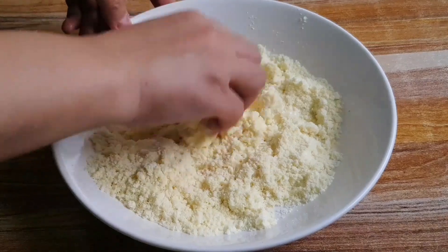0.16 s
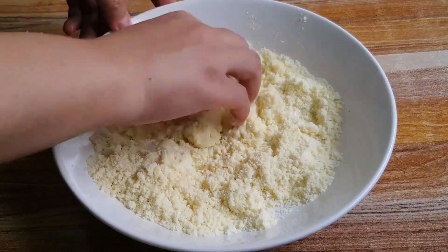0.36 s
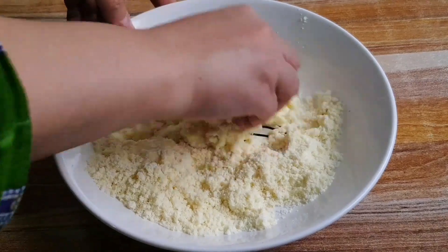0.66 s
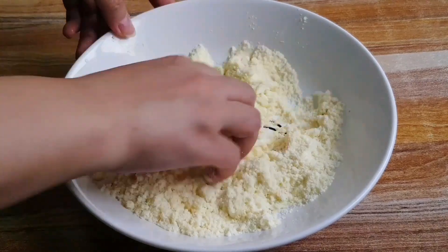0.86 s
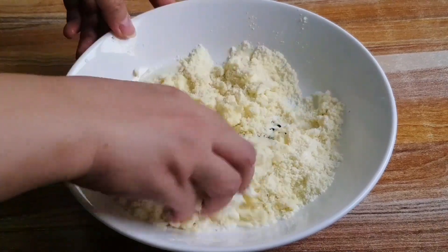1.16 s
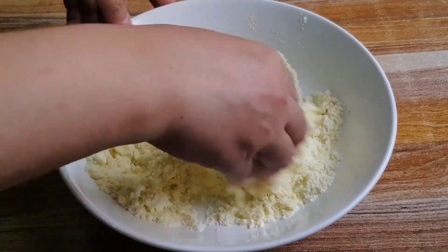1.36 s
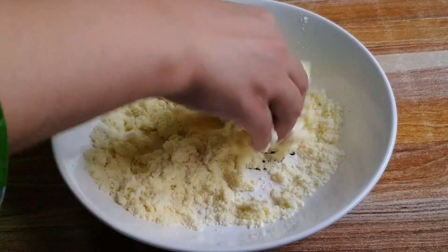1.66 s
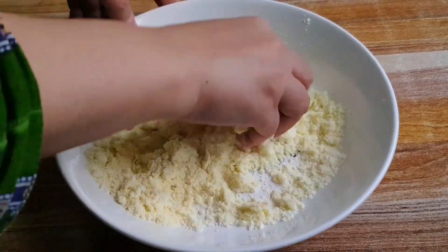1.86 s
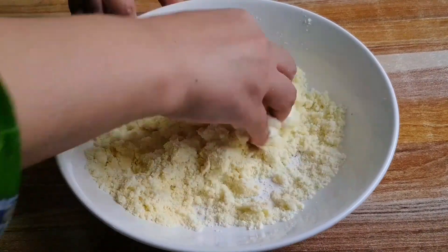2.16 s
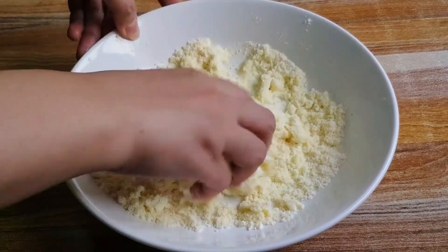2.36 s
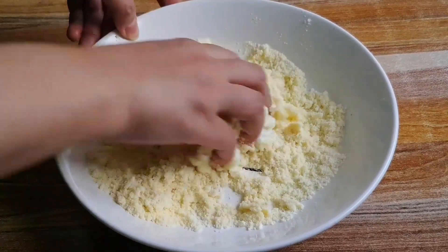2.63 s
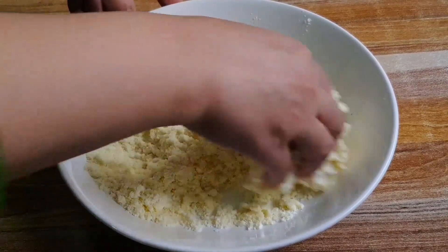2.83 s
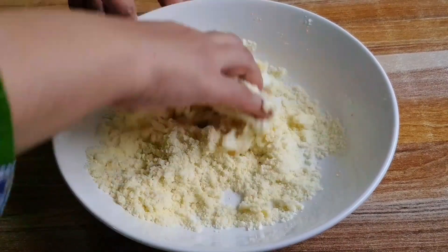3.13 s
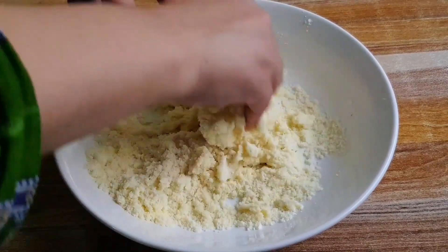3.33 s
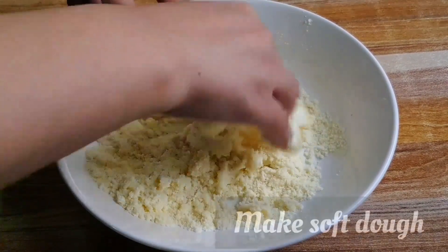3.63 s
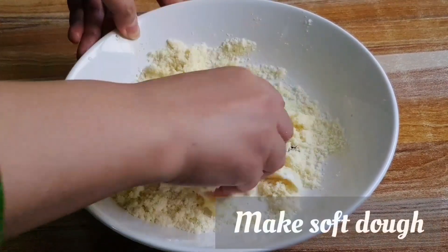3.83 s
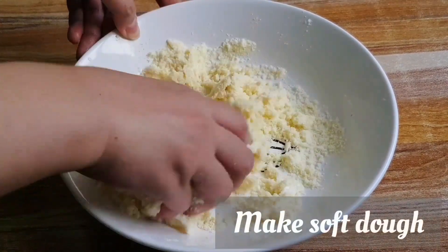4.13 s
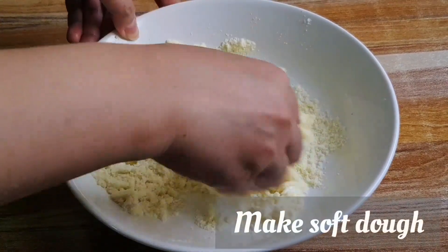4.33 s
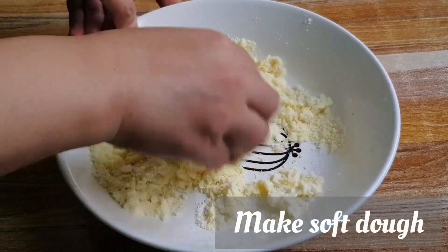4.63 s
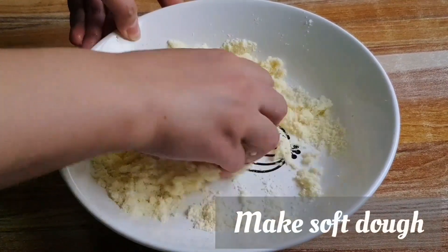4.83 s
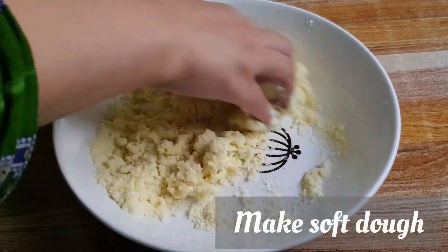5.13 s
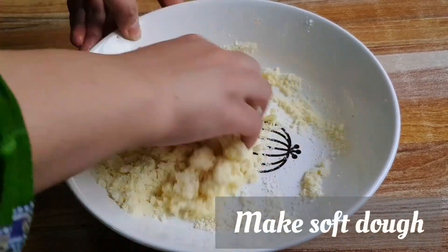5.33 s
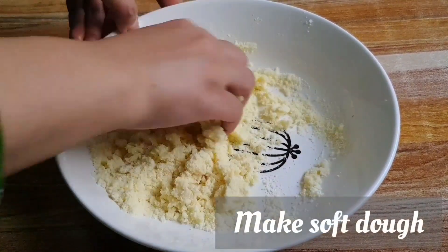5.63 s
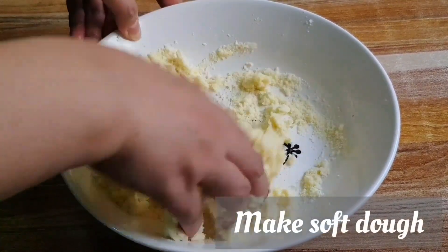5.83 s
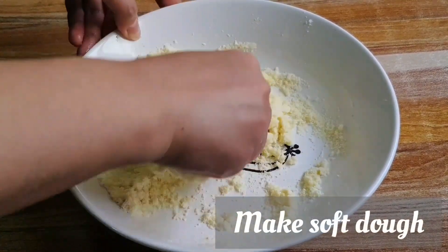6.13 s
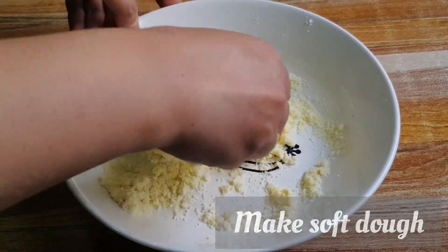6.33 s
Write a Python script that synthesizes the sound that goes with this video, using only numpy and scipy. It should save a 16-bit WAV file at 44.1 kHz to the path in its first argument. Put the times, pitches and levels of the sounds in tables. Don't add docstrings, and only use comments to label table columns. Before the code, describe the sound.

In a small kitchen, close to the microphone, fingers rub dry crumbly dough in a ceramic bowl. From 0 seconds, short gritty swishes come about three or four a second, hissing softly along the glaze, with a light crumb spray at 0.1. A distant motor hums low, surging and throbbing unevenly, with a thin wavering whine, deep room rumble and faint hiss. A slight nudge comes at 0.7, then firmer woody bumps at 1.5 and 1.7 as the bowl rocks, with scattered crumbs. Strokes continue alone with tiny squeaks from 2 to 2.7. A sharp knock lands at 3.0, duller ones at 3.7 to 4.3. The heaviest cluster runs from 4.4 to 5.2: a hard clack at 4.5 with loud crumbs, a strong stroke at 4.8, a ringing knock at 5.15. Afterwards come soft rubbing, brief squeaks at 5.3 and 6.0 and small sprays, fading into humming rumble by 6.5.

```python
import sys
import numpy as np
from scipy import signal
from scipy.fft import rfft, irfft
from scipy.io import wavfile
from scipy.ndimage import uniform_filter1d

SR = 44100
rng = np.random.default_rng(int(sys.argv[2]) if len(sys.argv) > 2 else 0)


def volts_from_db(level):
    exponent = np.asarray(level, float) / 20
    return 10 ** exponent


def generate_wav(sig):
    pcm = np.round(np.clip(np.atleast_2d(sig).T, -1, 1) * 32767).astype(np.int16)
    wavfile.write(sys.argv[1], SR, pcm)


N = 285768

# hz [Hz], density_db [dB per Hz]
DRAG_SPECTRUM = [(900, -42), (1500, 0.5), (2200, 1), (3500, -4.5), (5500, -8.5), (6500, -30), (9000, -43)]
CRUMB_SPECTRUM = [(3000, -30), (4500, -8.5), (5000, 1.5), (7000, -1.5), (8800, -3), (10000, -16.5),
                  (13000, -38)]
DUST_SPECTRUM = [(6000, -51), (9000, -5), (10500, 1.5), (13000, 2), (14500, -2), (16500, -0.5)]


def rub():
    out = np.zeros((2, N))
    for gain, spectrum in zip(pressure(), (DRAG_SPECTRUM, CRUMB_SPECTRUM, DUST_SPECTRUM)):
        large = rng.random(N) < 0.04
        size = 0.5 + volts_from_db(2.9 * np.minimum(rng.exponential(1, N), 3)) * large
        grains = [colour(size * noise, spectrum) for noise in rng.standard_normal((2, N))]
        out += volts_from_db(2.5) * gain * np.array(grains)
    catch = evened(uniform_filter1d(rng.standard_normal(N), size=900))
    crosstalk = 0.054 * out[::-1]
    return (out + crosstalk) * volts_from_db(1.1 * catch)


# peak_s [s], pressure_db [dB], fineness_db [dB], length_s [s]
FINGER_STROKES = [(0.128, -67.5, 1, 0.083), (.34, -79, 0, 0.14), (.58, -76.5, -1, 0.11),
                  (0.827, -77.5, -2, 0.22), (1.16, -72.5, 1.5, 0.19), (1.477, -70.5, 2, 0.11),
                  (1.575, -78, -10, 0.085), (1.735, -70, -4, 0.16), (2.055, -72.5, 0, 0.14),
                  (2.338, -70.5, 0.5, 0.16), (2.654, -75, -1, .2), (2.922, -70.5, 4.5, .1),
                  (2.99, -71.5, 3, 0.15), (3.204, -73.5, 2, 0.21), (3.495, -74, 1, 0.13),
                  (3.723, -75, 8, 0.12), (3.818, -77, -6, 0.23), (4.15, -70.5, 1, 0.22),
                  (4.474, -70.5, 5, 0.13), (4.535, -70.5, -13, 0.1), (4.787, -66, -0.5, 0.11),
                  (5.03, -73.5, 4, 0.29), (5.133, -70.5, -5, 0.15), (5.29, -73.5, 0, 0.23),
                  (5.623, -77.5, -1, 0.26), (5.87, -74, 9, 0.14), (5.963, -69.5, -1.5, 0.19),
                  (6.224, -71, 1.5, 0.15), (4.0, -81, 9, .15)]
# level_db [dB] of drag, crumbs and dust
REST_LEVELS = [-78.5, -85.5, -78.5]


def pressure():
    rise_db, fall_db = 23, 17.5
    t = np.arange(0, N + 64, 64) / SR
    power = volts_from_db(REST_LEVELS)[:, None] ** 2 * np.ones(len(t))
    for s, db, fine_db, length in FINGER_STROKES:
        u = (t - s) / length
        drag_db = 0.5 - 0.9 * fine_db
        dust_db = 0.5 + 0.7 * max(fine_db, 0)
        stroke_db = db + np.minimum(rise_db * u, -fall_db * u)
        power = power + volts_from_db(stroke_db + np.array([[drag_db], [0], [dust_db]])) ** 2
    return [np.interp(np.arange(N) / SR, t, np.sqrt(p)) for p in power]


# start_s [s], peak_db [dB], table_thump_db [dB], bowl_ring_db [dB], room_share_db [dB]
HARD_KNOCKS = [
    (1.543, -31, -34.5, -38.5, 4),
    (2.98, -27.5, -43.5, -46, -5.5),
    (3.84, -36.5, -40.5, -43, 6.5),
    (4.251, -35.5, -45, -57, -8),
    (4.525, -23, -42, -44.5, -8.5),
    (5.061, -40.5, -52, -50, 2),
    (5.146, -24.5, -41, -35.5, 0),
]
# mode_hz [Hz], level_db [dB], t60_s [s]
FOOT_MODES = [(285, -3, .14), (520, -7, .2), (628, -3, .28), (785, -12, .22), (916, -13, .2),
              (1090, -20, .15)]


def hard_knocks():
    return knocks(HARD_KNOCKS, 502, FOOT_MODES, snap_hz=1650, snap_near_db=-8, snap_db=-9.5)


# start_s [s], peak_db [dB], table_thump_db [dB], bowl_ring_db [dB], room_share_db [dB]
SOFT_NUDGES = [(0.703, -47, -63, -56, -7), (1.184, -50, -54, -59, -2), (1.463, -31.5, -39, -49.5, -3),
               (1.703, -29.5, -62, -38, -2), (3.179, -51, -58, -57, -11), (3.737, -39.5, -48, -57, 3.5),
               (4.102, -44, -44, -57.5, 5.5), (4.156, -51, -47, -60, 1), (4.403, -29.5, -56, -40, -0.5),
               (4.854, -42, -59, -59, -18), (4.972, -47, -47, -54, -2), (5.876, -56, -47, -55, -6),
               (6.384, -60, -59, -68, -1)]
# mode_hz [Hz], level_db [dB], t60_s [s]
BODY_MODES = [(259.7, 9, 0.092), (352, 5.5, 0.17), (461, -4, 0.21), (661.3, -1.5, 0.13)]


def soft_nudges():
    return knocks(SOFT_NUDGES, 373, BODY_MODES, snap_hz=1160, snap_near_db=6.5, snap_db=-7.5)


# mode_hz [Hz], level_db [dB], t60_s [s]
TABLE_MODES = [(84.3, -1, 0.2), (108, -5.5, 0.14), (248.5, -8, 0.17)]


def knocks(rows, hz, bowl, snap_hz, snap_near_db, snap_db):
    direct, wet = np.zeros(N), np.zeros(N)
    u = (np.arange(400) / SR - 0.0022) * snap_hz
    snap = np.sin(2 * np.pi * u) * np.exp(-(u / 0.99) ** 2)
    pulse = contact(hz)
    for s, peak_db, table_db, bowl_db, room_db in rows:
        i = round(s * SR)
        ring = volts_from_db(table_db + 11.5) * ringing(TABLE_MODES, rise_s=0.011, spread=0.065)
        ring += volts_from_db(bowl_db) * ringing(bowl, rise_s=0.0055, spread=0.86)
        direct[i:i + len(ring)] += ring[:N - i]
        snap_gain = volts_from_db(bowl_db + snap_db)
        direct[i:i + 400] += volts_from_db(peak_db + 3.0) * pulse + snap_gain * volts_from_db(snap_near_db) * snap
        wet[i:i + 400] += volts_from_db(room_db) * (volts_from_db(peak_db + 3.5) * pulse + snap_gain * snap)
    return direct * volts_from_db([[1.2], [-1.2]]), wet


def contact(hz):
    u = (np.arange(400) / SR - 0.0018) * hz
    rebound = np.where(u > 0, np.exp(-1.5 * u), 1)
    return np.cos(2 * np.pi * u) * np.exp(-(u / 0.35) ** 2) * rebound


def ringing(modes, rise_s, spread):
    t, ring = np.arange(SR // 2) / SR, 0
    phases = spread * rng.uniform(0, 2 * np.pi, len(modes))
    for (hz, db, t60), phase in zip(modes, phases):
        ring = ring + volts_from_db(db - 60 * t / t60) * np.sin(2 * np.pi * hz * t + phase)
    return ring * (1 - np.exp(-(t / rise_s) ** 2))


# band_hz [Hz], t60_s [s]
ROOM_DECAY = [(100, 0.76), (330, 0.33), (870, 0.19), (1400, 0.33), (2300, 0.11), (8000, 0.11)]
# band_hz [Hz], likeness [0 to 1]
PORT_LIKENESS = [(60, 0.89), (250, 1), (500, 0.59), (1000, 0.19), (2000, 0.055), (4000, 0.11)]


def kitchen(x, gap_s):
    taps = np.zeros((2, SR // 2))
    at = np.arange(0, SR // 2 - 20, 20)
    at = at + rng.integers(0, 20, at.shape)
    taps[:, at] = rng.choice([-1., 1.], (2, len(at)))
    hz, t, z = signal.stft(taps, SR, nperseg=512)
    same = np.clip(read(PORT_LIKENESS, hz), 0, 1)[:, None]
    z[1] = same * z[0] + np.sqrt(1 - same ** 2) * z[1]
    decay = volts_from_db(-60 * t / read(ROOM_DECAY, hz)[:, None])
    tail = signal.istft(z * decay, SR, nperseg=512)[1]
    t = np.arange(tail.shape[1]) / SR
    tail *= np.clip(t / gap_s - 0.5, 0, 1)
    tail *= 1 + 0.25 * np.cos(2 * np.pi * (t - 0.011) / 0.0303)
    return signal.fftconvolve(x[None], tail / np.linalg.norm(tail[0]), axes=1)[:, :N]


# start_s [s], level_db [dB], centre_hz [Hz], width_hz [Hz], t60_s [s]
CRUMB_SPRAYS = [
    (.105, -62, 8000, 7000, .2),
    (1.702, -57.5, 6000, 7000, 0.26),
    (4.455, -66, 6000, 2500, 0.32),
    (4.516, -56, 4333, 2982, 0.38),
    (5.865, -61.5, 10800, 4980, 0.23),
    (6.195, -63, 9000, 7000, 0.19),
]


def scatters():
    t, out = np.arange(SR // 2) / SR, np.zeros((2, N))
    for s, db, hz, width, t60 in CRUMB_SPRAYS:
        band = signal.butter(2, [hz - width / 2, hz + width / 2], "bandpass", fs=SR, output="sos")
        large = rng.random(len(t)) < 0.02
        grains = rng.standard_normal((2, len(t))) * (1 + 1.5 * large)
        envelope = volts_from_db(db - 60 * t / t60) * np.minimum(t / 0.0041, 1)
        spray = evened(signal.sosfilt(band, grains)) * envelope
        i = round(s * SR)
        out[:, i:i + len(t)] += spray[:, :N - i]
    return out


# centre_s [s], pitch_hz [Hz], level_db [dB], length_s [s]
FINGER_SQUEAKS = [(0.86, 2170, -81, 0.045), (2.056, 2140, -79, .05), (2.074, 2074, -80, .05),
                  (2.39, 2145, -76.5, 0.049), (2.666, 2100, -76, 0.044), (3.206, 2130, -76, 0.046),
                  (5.285, 2150, -73, 0.071), (5.98, 2170, -75, 0.066)]


def squeaks():
    t, out = np.arange(N) / SR, np.zeros(N)
    flutter = 1 + 0.47 * evened(uniform_filter1d(rng.standard_normal(N), size=400))
    for s, hz, db, length in FINGER_SQUEAKS:
        bell = np.exp(-(2 * (t - s) / length) ** 2)
        out += volts_from_db(db + 8.5) * bell * np.sin(2 * np.pi * hz * t)
    return out * flutter


# start_s [s], length_s [s], level_db [dB]
HUM_SURGES = [(.34, 0.12, -48), (0.527, 0.69, -48.5), (1.662, 0.091, -47), (3.33, .33, -45),
              (3.653, 0.53, -45), (4.374, 0.11, -47.5), (4.514, .08, -47), (4.664, 0.077, -48),
              (5.1, .2, -59), (5.58, .09, -49), (5.78, 0.53, -46.5)]
# start_s [s], length_s [s],
# # level_db [dB], pitch_hz [Hz]
OCTAVE_THROBS = [(0.066, 0.25, -51.5, 119.2), (0.415, 0.084, -48, 115), (.66, .3, -51.5, 115.3),
                 (1.1, 0.32, -52.5, 115.2), (1.45, 0.22, -46.5, 112), (1.714, 0.063, -40.5, 112),
                 (1.831, 0.14, -47.5, 116.4), (2.407, 0.046, -49.5, 117), (2.607, 0.079, -56, 117),
                 (2.886, 0.22, -47.5, 112.5), (3.45, 0.2, -50.5, 113.1), (3.8, 0.12, -45.5, 112),
                 (4.09, 0.095, -50, 108.5), (4.52, .07, -46, 109), (4.665, 0.053, -42.5, 117.5),
                 (4.995, .25, -54.5, 117.5), (5.674, 0.12, -47.5, 113.4), (6.103, 0.044, -48, 108),
                 (6.4, 0.25, -48.5, 112.7)]
# time_s [s], level_db [dB]
DRONE_LEVEL = [(0.0, -52), (0.5, -49.5), (1.48, -53), (2.2, -52.5), (2.47, -46.5), (2.88, -65),
               (3.01, -45.5), (3.5, -52), (4.56, -51), (4.98, -60.5), (5.32, -51.5), (5.81, -59),
               (6.0, -50.5), (6.48, -49.5)]


def motor():
    hum_hz = 58
    surge = sum(volts_from_db(db) * plateau(s, length, 0.075, hum_hz) for s, length, db in HUM_SURGES)
    throb = sum(volts_from_db(db) * plateau(s, length, 0.1, hz) for s, length, db, hz in OCTAVE_THROBS)
    idle = volts_from_db(-58.5) * fuzz(hum_hz + 2.3, 14) + volts_from_db(-56) * fuzz(115.5, 11)
    drone = volts_from_db(curve(DRONE_LEVEL) - 0.5) * fuzz(223.9, 21.9)
    return surge + throb + idle + drone * volts_from_db([[0.5], [-0.5]])


def plateau(start, length, edge_s, hz):
    out = np.zeros(N)
    at = slice(max(round((start - edge_s) * SR), 0), round((start + length + edge_s) * SR))
    t = np.arange(N)[at] / SR
    swell = np.clip(0.5 + np.minimum(t - start, start + length - t) / edge_s, 0, 1)
    out[at] = np.sqrt(2) * np.sin(np.pi / 2 * swell) ** 2 * np.sin(2 * np.pi * hz * t)
    return out


def fuzz(hz, width):
    off = (np.fft.rfftfreq(N, 1 / SR) - hz) / (width / 2)
    return evened(irfft(rfft(rng.standard_normal(N)) / (1 + off ** 2), N))


# time_s [s], level_db [dB]
WHINE_LEVEL = [(0, -71.5), (.9, -72), (1.5, -71.5), (2.6, -72), (3.4, -75.5), (4.3, -72), (5.3, -75.5),
               (6.48, -77.5)]


def whine():
    noise = rng.standard_normal(N)
    waver = evened(uniform_filter1d(uniform_filter1d(noise, size=1200), size=1200))
    hz = 1851 + 7.5 * waver
    lag = np.array([[0.25], [0]])
    tone = np.sqrt(2) * np.sin(2 * np.pi * (np.cumsum(hz) / SR + lag))
    halo = 0.3 * np.array([evened(resonate(noise, hz, 30)) for noise in rng.standard_normal((2, N))])
    return volts_from_db(curve(WHINE_LEVEL)) * (tone + halo)


def resonate(x, hz, width):
    turn = np.exp(2j * np.pi * np.cumsum(hz * np.ones(N)) / SR)
    r = np.exp(-np.pi * width / SR)
    return 2 * (turn * signal.lfilter([1 - r], [1, -r], x / turn)).real


# hz [Hz], density_db [dB per Hz]
RUMBLE_SPECTRUM = [(15, -70), (25, -12), (45, -8), (98, -9), (158, -11), (226, 0), (277, -6), (421, -11.5),
                   (695, -25.5), (920, -23.5), (1710, -33.5), (1850, -30), (2180, -42), (3000, -48),
                   (3900, -86), (6600, -120)]


def rumble():
    return volts_from_db(-49.5 + 1.5) * wash(RUMBLE_SPECTRUM, patchy_db=1.05, likeness=0.96)


# hz [Hz], density_db [dB per Hz]
HISS_SPECTRUM = [(1500, -21), (2300, -6.5), (3200, -2), (4500, -37), (6000, -9.5), (8000, -30), (9500, -9),
                 (11800, -0.5), (15200, 0.5), (16500, 2.5)]


def self_noise():
    return volts_from_db(-73.5 + 6.5) * wash(HISS_SPECTRUM, patchy_db=0.7, likeness=0)


# band_hz [Hz], left_over_right_db [dB]
PORT_LEAN = [(60, 1), (180, -0.5), (550, 3), (1650, -2), (4970, 6), (15000, 0)]


def wash(spectrum, patchy_db, likeness):
    frames, hz = N // 256 + 5, np.fft.rfftfreq(2048, 1 / SR)
    a, b, c, d, patches = rng.standard_normal((frames // 2, 1025, 5)).T
    patches = evened(uniform_filter1d(uniform_filter1d(patches, size=16, axis=0), size=6, axis=1))
    same = np.clip(likeness * read(PORT_LIKENESS, hz), 0, 1)[:, None]
    left, other = a + 1j * b, c + 1j * d
    z = np.array([left, same * left + np.sqrt(1 - same ** 2) * other])
    lean_db = np.array([0.5, -0.5])[:, None] * read(PORT_LEAN, hz)
    z *= volts_from_db((read(spectrum, hz) + lean_db)[:, :, None] + patchy_db * patches)
    return evened(signal.istft(z, nperseg=2048, noverlap=1536)[1][:, :N])


def colour(x, spectrum):
    return evened(irfft(rfft(x) * volts_from_db(read(spectrum, np.fft.rfftfreq(N, 1 / SR))), N))


def evened(x):
    return x / np.sqrt(np.mean(x ** 2) + 1e-20)


def read(points, hz):
    f, value = np.transpose(points)
    return np.interp(np.log(hz + 1), np.log(f + 1), value)


def curve(rows):
    s, level = np.transpose(rows)
    return np.interp(np.arange(N) / SR, s, level)


def expanded(x, depth):
    hz, t, z = signal.stft(x, SR, nperseg=2048, noverlap=1536)
    power = uniform_filter1d(abs(z.mean(0)) ** 2, size=5, axis=1) + 1e-20
    share = power / uniform_filter1d(power, size=25, axis=0)
    z *= np.where(hz[:, None] > 2300, np.minimum(1.5 * share, 1) ** depth, 1)
    return signal.istft(z, SR, nperseg=2048, noverlap=1536)[1][:, :N]


def scene():
    hard, hard_wet = hard_knocks()
    soft, soft_wet = soft_nudges()
    room = kitchen(hard_wet + soft_wet, gap_s=0.003)
    bowl = rub() + hard + soft + room + scatters() + squeaks()
    return bowl + motor() + whine() + rumble()


def roll_off(x):
    return signal.sosfilt(signal.butter(12, 15740, fs=SR, output="sos"), x)


def record(dry):
    ports = np.array([np.roll(dry[0], shift=4), dry[1]])
    bass_cut = signal.butter(2, 36, "highpass", fs=SR, output="sos")
    noisy = signal.sosfilt(bass_cut, ports) + self_noise()
    quiet = expanded(noisy, depth=0.7)
    band_limit = signal.firwin(511, 15750, window=("kaiser", 9), fs=SR)[None]
    mix = signal.oaconvolve(quiet, band_limit, "same")
    return roll_off(mix)


dry = scene()
out = record(dry)
generate_wav(out)
```